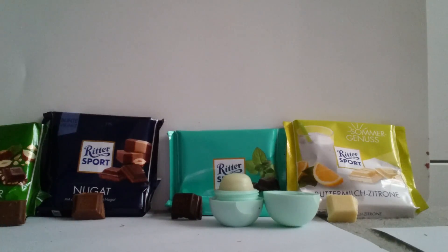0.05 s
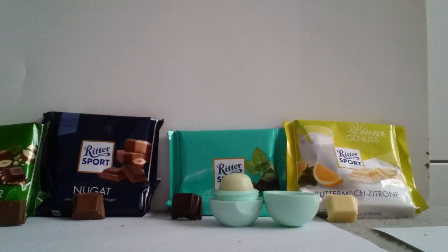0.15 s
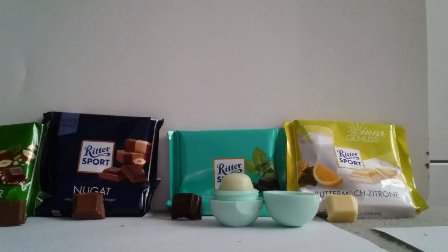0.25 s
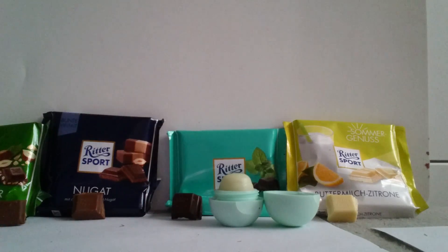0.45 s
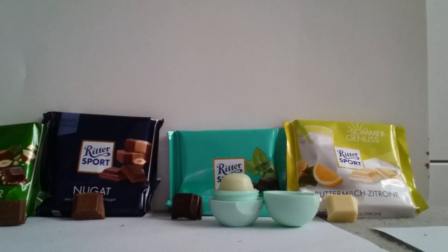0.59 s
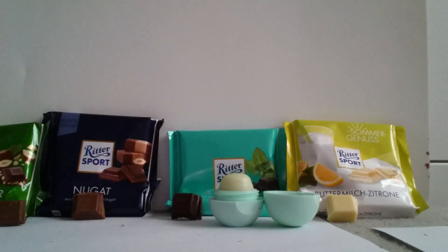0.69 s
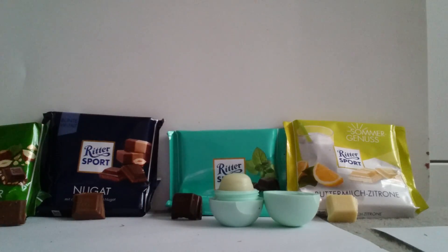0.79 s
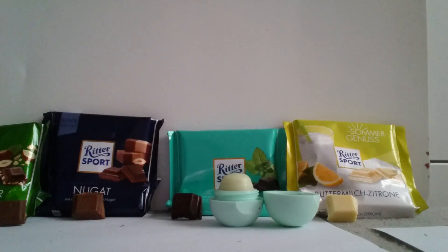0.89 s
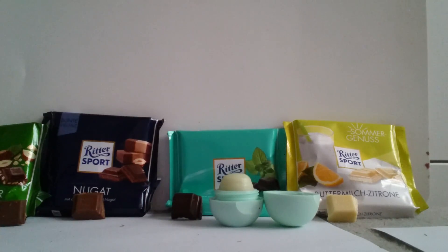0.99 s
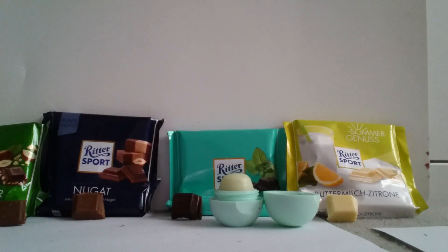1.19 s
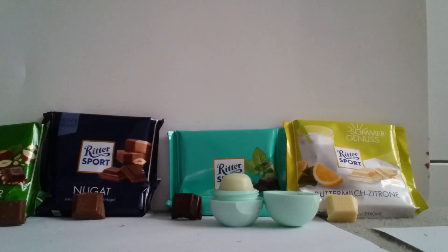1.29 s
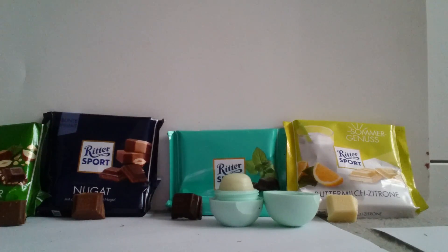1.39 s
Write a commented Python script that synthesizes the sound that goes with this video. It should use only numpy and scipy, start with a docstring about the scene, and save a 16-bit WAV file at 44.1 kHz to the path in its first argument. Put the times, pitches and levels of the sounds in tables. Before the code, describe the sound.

A stiff chocolate wrapper rustles and ticks lightly, close by in a quiet room. From about 0.2 to 0.3 seconds its seam gives way in a quickening run of loud snaps, followed by a faint squeak. Crinkles and finger rubbing pick up around 0.6 seconds, and the bar breaks with one sharp click near 0.75. Smaller crackles and a soft rustle die away by about 1.4 seconds.

```python
"""A stiff chocolate wrapper gives way in a quickening run of snaps, close by in a quiet room.
Each snap is a jump of the seam: an impulse, a little tearing, a short ring. Creases pop, film and bar
click, and the bar breaks with one sharp click. Tiny slips make the rub of fingers and a soft rustle
that dies away; the sliding film squeaks faintly. Two microphones of opposite polarity pick it up."""
import sys
import numpy as np
from scipy import signal
from scipy.fft import rfft, irfft
from scipy.io import wavfile
from scipy.ndimage import uniform_filter1d, minimum_filter1d

SR = 44100
rng = np.random.default_rng(int(sys.argv[2]) if len(sys.argv) > 2 else 0)


def dump_mix(stems):
    """Bounce the given channels to the path in sys.argv[1] as a 16-bit WAV at rate SR."""
    frames = np.atleast_2d(stems).T  # one column per channel
    limited = np.clip(frames, -1, 1)  # hard clip at full scale
    pcm = np.round(limited * 32767).astype(np.int16)
    wavfile.write(sys.argv[1], SR, pcm)


N = 63945
TIME_S = np.arange(N) / SR
FFT_SIZE = 2 ** 17
HZ = np.maximum(np.arange(FFT_SIZE // 2 + 1) * SR / FFT_SIZE, 1)
EVENT_HZ = np.linspace(1, SR / 2, 1025)  # coarse grid for short events


def from_db(db):
    return 10 ** (np.asarray(db) / 20)


def unit_rms(x):
    return x / np.sqrt(np.mean(x ** 2) + 1e-20)


def at_hz(points, hz=HZ):
    """Interpolate a table over log frequency."""
    points_hz, values = np.transpose(points)
    return np.interp(np.log(hz), np.log(points_hz), values)


def in_time(rows):
    """Interpolate each column linearly over time."""
    times_s, *columns = np.transpose(rows)
    return [np.interp(TIME_S, times_s, column) for column in columns]


def add(out, start_s, x):
    start = int(start_s * SR)
    out[..., start:start + x.shape[-1]] += x[..., :N - start]


def colour(x, gain):
    """Minimum-phase filter with the given gain per frequency."""
    size = 2 * (len(gain) - 1)
    cepstrum = irfft(np.log(gain + 1e-9))
    cepstrum[1:size // 2] *= 2
    cepstrum[size // 2 + 1:] = 0
    return irfft(rfft(x, size) * np.exp(rfft(cepstrum)))[..., :x.shape[-1]]


def resonance(hz, q):
    """Steep-sided resonance curve, peak 1."""
    return 1 / (1 + (q * (EVENT_HZ / hz - hz / EVENT_HZ)) ** 2)


def ringing(x, hz, hold_s, lift_db=0):
    """Delay and optionally lift one band, so it rings after the attack."""
    detune = 2 * np.pi * (HZ - hz) * hold_s
    allpass = ((1 - 1j * detune) / (1 + 1j * detune)) ** 2
    return irfft(rfft(x, FFT_SIZE) * allpass * from_db(lift_db / (1 + detune ** 2)))[:, :N]


def echoed(x, left_s, right_s, db):
    """Add one reflection from a nearby surface."""
    delay = np.exp(-2j * np.pi * np.outer([left_s, right_s], HZ))
    return x + from_db(db) * irfft(rfft(x, FFT_SIZE) * delay)[:, :N]


def panned(x, pan_db):
    """Pan by the level of left over right."""
    return np.array([x[0] * from_db(pan_db / 2), x[1] * from_db(-pan_db / 2)])


# Each row: frequency in Hz, left-right correlation.
DIRECT_CORRELATION = [(100, 0.85), (1000, 0.88), (2500, 0.94), (4500, 0.2), (8000, 0.47), (15000, 0.15)]
DIFFUSE_CORRELATION = [(100, 0.55), (700, 0.35), (2500, 0.094), (4500, 0.027), (15000, .05)]

def stereo(pair, correlation):
    """Mix two independent signals into partly correlated channels."""
    alike = np.clip(at_hz(correlation), -.99, .99)
    mid, side = rfft(pair, FFT_SIZE) * np.sqrt([(1 + alike) / 2, (1 - alike) / 2])
    return irfft([mid + side, mid - side])[:, :N]


# Each row: frequency in Hz, relative level in dB.
BACKGROUND_SPECTRUM = [(20, -18), (35, -37), (60, 16), (100, 12), (200, 3.5), (400, 8.5), (900, -1.5),
                       (2000, 4), (3600, 5), (5300, -13), (7000, 4), (11000, -23), (15500, -6)]

def background(level_db=-66.5):
    """Steady hiss and faint rumble of a quiet room."""
    hiss = colour(rng.standard_normal((2, N)), unit_rms(from_db(at_hz(BACKGROUND_SPECTRUM))))
    return from_db(level_db) * stereo(hiss, DIFFUSE_CORRELATION)


# Each row: frequency in Hz, relative gain in dB.
REVERB_SPECTRUM = [(150, 11), (700, -0.5), (1500, 5), (2200, -3), (4500, -2), (7500, -1), (15000, -4.5)]

def reverb(x, t60_s=.28, build_s=.004, gain_db=-11.5):
    """The room's diffuse tail builds quickly and decays exponentially."""
    envelope = from_db(-60 * TIME_S / t60_s) * (1 - np.exp(-(TIME_S / build_s) ** 2))
    tail = stereo(unit_rms(rng.standard_normal((2, N)) * envelope) / np.sqrt(N), DIFFUSE_CORRELATION)
    wet = signal.fftconvolve(x, tail, axes=1)[:, :N]
    return colour(wet, from_db(gain_db + at_hz(REVERB_SPECTRUM)))


def friction(levels, spectrum, correlation, slips_per_s=5600, spread_db=.5):
    """Dense tiny slips of uneven size under a level curve."""
    slipping = rng.random((2, N)) < slips_per_s / SR
    sizes = from_db(spread_db * np.minimum(rng.exponential(1, (2, N)), 5))
    signs = rng.choice([-1, 1], (2, N))
    level_db, = in_time(levels)
    slips = unit_rms(slipping * sizes * signs) * from_db(level_db)
    return stereo(colour(slips, unit_rms(from_db(at_hz(spectrum)))), correlation)


# Each row: time in seconds, level in dB.
RUSTLE_LEVELS = [(0, -48.5), (.045, -47), (.09, -50.5), (.125, -56), (.2, -51.5), (.27, -48.5),
                 (.33, -47.5), (.385, -45.5), (.45, -55.5), (.53, -59.5), (.585, -54), (.63, -41.5),
                 (.73, -56), (.84, -51), (.885, -46), (.93, -52.5), (1.03, -59.5), (1.085, -63.5),
                 (1.17, -57), (1.27, -52.5), (1.37, -61.5), (1.45, -61.5)]
# Each row: frequency in Hz, relative level in dB.
RUSTLE_SPECTRUM = [(200, -21), (900, -19.5), (2000, -38.5), (3100, -10), (4000, -8), (5000, 3),
                   (5800, -0.5), (7000, -11), (9000, -14), (12000, -17.5), (15000, -16.5)]
# Each row: time in seconds, pan in dB.
RUSTLE_PAN = [(0, -1.5), (.4, -2.5), (.9, -3), (1.3, -5)]

def film_rustle():
    """Fine, bright friction of the film, drifting right."""
    pan_db, = in_time(RUSTLE_PAN)
    return panned(friction(RUSTLE_LEVELS, RUSTLE_SPECTRUM, DIFFUSE_CORRELATION), pan_db)


# Each row: time in seconds, level in dB.
RUB_LEVELS = [(0, -69.5), (.44, -62), (.48, -64.5), (.57, -59.5), (.64, -41), (.665, -62), (.70, -45),
              (.735, -69), (.765, -39), (.80, -80), (.855, -61), (.88, -38), (.92, -62.5), (1.02, -57),
              (1.09, -69), (1.25, -60), (1.36, -69.5), (1.45, -72)]
# Each row: frequency in Hz, relative level in dB.
RUB_SPECTRUM = [(100, -19.5), (430, -17), (700, -0.5), (1000, 1.5), (1500, -1), (2200, -1.5), (3200, -5.5),
                (6000, -17.5), (15000, -19)]

def finger_rub():
    """Duller friction of fingers on the bar."""
    return friction(RUB_LEVELS, RUB_SPECTRUM, DIRECT_CORRELATION)


# Each row: time in seconds, pitch in Hz, level in dB.
SQUEAK_CURVE = [(.405, 1620, -54), (.435, 1579, -62), (.48, 1600, -49.5), (.52, 1663, -66),
                (.56, 1560, -61.5), (.59, 1670, -82)]

def film_squeak(wobble_hz=22.3):
    """Sliding film gives a thin, unsteady tone."""
    pitch_hz, level_db = in_time(SQUEAK_CURVE)
    wobble = unit_rms(uniform_filter1d(rng.standard_normal(N), size=200))
    phase = 2 * np.pi * np.cumsum(pitch_hz + wobble_hz * wobble) / SR
    sounding = (TIME_S > SQUEAK_CURVE[0][0]) & (TIME_S < SQUEAK_CURVE[-1][0])
    return sounding * from_db(level_db) * np.sqrt(2) * np.sin(phase)


def thud(start_s=.286, level_db=-60, cutoff_hz=110, rise_s=.0095, t60_s=.077):
    """A faint low jolt under the hardest snaps."""
    out = np.zeros((2, N))
    lowpass = signal.butter(2, cutoff_hz, fs=SR, output="sos")
    rumble = unit_rms(signal.sosfilt(lowpass, rng.standard_normal((2, N))))
    envelope = from_db(level_db - 60 * TIME_S / t60_s) * np.minimum(TIME_S / rise_s, 1)
    add(out, start_s, envelope * rumble)
    return out


def tearing(length_s, rise_s=.0002, fall_s=.00063, size=1024):
    """Two independent unit-energy noise bursts that decay after length_s."""
    t = np.arange(size) / SR
    envelope = np.minimum(t / rise_s, 1) * np.exp(-np.maximum(t - length_s, 0) / fall_s)
    burst = rng.standard_normal((2, size)) * envelope
    for _ in range(3):  # flatten the spectrum, keep the burst short
        burst = irfft(np.exp(1j * np.angle(rfft(burst)))) * np.sqrt(envelope)
    return unit_rms(burst) / np.sqrt(size)


KNOCK_HZ, BODY_HZ, CRACK_HZ, FIZZ_HZ = 797, 2040, 5130, 9300
KNOCK_Q, BODY_Q, CRACK_Q = 1.8, 4.1, 3.5

# Each row: frequency in Hz, relative level in dB.
CREASE_SPECTRUM = [(100, -30.5), (400, -31), (750, -4), (1100, -1.5), (2100, -13), (3200, -5), (4700, 6.5),
                   (5700, 7.5), (7300, -12), (12000, -21), (15000, -9)]
# Each row: start in seconds, level in dB, knock in dB, fizz in dB, length in ms.
CREASE_POPS = [(0.1444, -23.5, 14, 0, 1.24), (.3050, -3.5, 3.5, -27, 1.4), (0.3466, -22, 0, -4, 1.8),
               (0.595, -21, 10, -32, 2.5), (0.6257, -10.5, -15, -7, 2.4), (.6420, -22, 28, -2, 0.69),
               (0.666, -20, 16, -5, 1.8), (0.6707, -17, 7, -19, 1.4), (0.6829, -13.5, 17, -19, 0.73),
               (.6975, -12.5, 19, -16, 4.3), (.7025, -16.5, 18, -19, 1.55), (0.7083, -14, 2, -18, 0.59),
               (.7180, -22, 11, -22, 1.8), (0.753, -13, 13.5, -9, 1.7), (0.762, -20, 2, -2, 1.3),
               (0.812, -23, 13.5, -26, 3.7), (0.8524, -29, 27, 17, 1.26), (.8680, -13, 10, 4.5, 9.4),
               (.8950, -17.5, 13.5, 0, 7.9), (0.931, -23.5, 12.5, -13, 1.6), (0.9365, -29, 18, -2, 1.5),
               (0.9566, -21, -21, 1, 3.4), (.9630, -33, 26, -12, 2), (0.9961, -35.5, 30, 2, 3),
               (1.005, -28.5, 21, -3, 2.16), (1.030, -23, 8.5, -12, 8.5), (1.144, -23, -29, 4, 3.05),
               (1.1951, -17.5, -27, -1, 5.2)]

def creases():
    """Wrapper folds pop over, crisp or drawn out, some with a knock from the bar inside."""
    out = np.zeros((2, N))
    for start_s, level_db, knock_db, fizz_db, length_ms in CREASE_POPS:
        bands = [(KNOCK_HZ, knock_db), (BODY_HZ, knock_db / 2), (CRACK_HZ, 0), (FIZZ_HZ, fizz_db)]
        pop = colour(tearing(length_ms / 1000), from_db(level_db + at_hz(bands, EVENT_HZ)))
        add(out, start_s, pop)
    return stereo(colour(out, unit_rms(from_db(at_hz(CREASE_SPECTRUM)))), DIRECT_CORRELATION)


# Each row: frequency in Hz, relative level in dB.
FIZZ_SPECTRUM = [(100, -26), (400, -1.5), (1000, 0.5), (6000, 9.5), (7600, 1.5), (10000, -1), (12500, -0.5),
                 (15000, 4)]
# Each row: start in seconds, knock in Hz and dB, body in Hz and dB, crack in Hz and dB,
# fizz in dB, pan in dB.
FRACTURES = [(0.0619, 780, -8, 2640, -7, 4840, 5, -25.5, 2),
             (0.1493, 1830, -11.5, 4300, -11, 5340, 0.5, -26.5, -8),
             (0.1537, 1110, 1, 1900, 1.5, 4310, 9, -21, 2),
             (0.3571, 1010, 0.5, 3770, -1, 4900, -12, -13.5, 7),
             (0.3587, 1280, 2, 2550, 4.5, 4800, 8, -12, 1), (0.4549, 806, 4, 3270, -3, 5100, -7, -28, -1.5),
             (.6072, 1150, 6.5, 3220, 5, 4950, 11.5, -19, -2),
             (.6160, 1240, -6.5, 3300, -1, 4800, 7.5, -13, 0.5),
             (.7460, 1020, 11.5, 3390, 13.5, 4670, 17, -4.5, -0.5),
             (0.8299, 1520, -7, 2680, 3.5, 4870, 6.5, -26, 0)]

def clicks():
    """Short fractures of bar and film, each exciting three resonances over a broad fizz."""
    out = np.zeros((2, N))
    for start_s, knock_hz, knock_db, body_hz, body_db, crack_hz, crack_db, fizz_db, _ in FRACTURES:
        gains = [from_db(knock_db) * resonance(knock_hz, KNOCK_Q),
                 from_db(body_db) * resonance(body_hz, BODY_Q),
                 from_db(crack_db) * resonance(crack_hz, CRACK_Q),
                 from_db(fizz_db + at_hz(FIZZ_SPECTRUM, EVENT_HZ))]
        add(out, start_s, colour(tearing(length_s=.00207), np.linalg.norm(gains, axis=0)))
    pan_db, = in_time([(row[0], row[-1]) for row in FRACTURES])
    return panned(stereo(out, DIRECT_CORRELATION), pan_db)


# Each row: frequency in Hz, relative level in dB.
SNAP_SPECTRUM = [(100, -43), (350, -32), (700, -21), (1000, -9), (1450, -11), (2000, -3.5), (2550, -9.5),
                 (3300, -4), (4000, -4.5), (5800, -10.5), (7300, -18), (9000, -16), (12500, -21.5),
                 (15000, -9)]
# Each row: start in seconds, level in dB, knock in dB, body in dB, crack in Hz and dB,
# fizz in dB, pan in dB.
SEAM_JUMPS = [(.2120, 6, -0.5, 3.5, 6170, 8, -1, 0.5), (0.2393, 9, -1, -1, 5530, 11.5, -6.5, 0),
              (0.2591, 13, -3.5, -9, 5170, 3, -12, -3.5), (.2780, 18.5, -20, -3, 5520, 12, -7, -2.5),
              (0.2923, 20.5, -9.5, -1.5, 4670, 4, -4, 2.5), (.3000, 5, 5, -11, 4600, 13, -3, -5)]

def seam_snaps(tear_db=-5, ring_hz=3970, ring_loss_db_per_db=.35, pivot_db=16):
    """The seam jumps repeatedly: an impulse with a little tearing, then a short pitched ring."""
    out = np.zeros((2, N))
    for start_s, level_db, knock_db, body_db, crack_hz, crack_db, fizz_db, pan_db in SEAM_JUMPS:
        jump = from_db(tear_db) * tearing(length_s=.00103)
        jump[:, 0] += 1  # the impulse
        bands = [(KNOCK_HZ, knock_db), (BODY_HZ, body_db), (ring_hz, 0), (FIZZ_HZ, fizz_db)]
        tone_db = at_hz(bands, EVENT_HZ) + crack_db * resonance(crack_hz, CRACK_Q)
        # harder snaps ring relatively less
        tone_db -= ring_loss_db_per_db * (level_db - pivot_db) * resonance(ring_hz, q=7.1)
        snap = colour(jump, from_db(level_db + tone_db + at_hz(SNAP_SPECTRUM, EVENT_HZ)))
        add(out, start_s, panned(snap, pan_db))
    rung = ringing(out, ring_hz, hold_s=.0013, lift_db=4.5)
    return echoed(rung, left_s=.0013, right_s=.001131, db=-6)  # off the tabletop


def scene():
    """Wrapper and bar, with a wall echo, reverb and room hiss."""
    rustle = film_rustle()
    cracks = ringing(seam_snaps() + clicks(), hz=4300, hold_s=.00025)  # the film's broad resonance lags
    handling = cracks + creases() + thud() + film_squeak() + rustle + finger_rub()
    return echoed(handling, left_s=.0127, right_s=.0125, db=-21) + reverb(handling) + background()


def limiter(x, ceiling=.75, window_s=.003):
    """The gain ducks briefly around peaks above the ceiling."""
    size = int(window_s * SR)
    peak = np.abs(x).max(axis=0)
    gain = minimum_filter1d(ceiling / np.maximum(peak, ceiling), size)
    return x * uniform_filter1d(gain, size)


# Left microphone, then right. Each row: port resonance in Hz, width in Hz, gain in dB.
MIC_PORTS = [(4800, 120, 4), (5900, 450, 3.5)]

def record(dry, right_lag_s=.00013, cutoff_hz=16200):
    """Each port rings; the right side is inverted and late; peaks are limited and the top is cut."""
    left, right = [colour(channel, from_db(gain_db / (1 + (2 * (HZ - port_hz) / width_hz) ** 2)))
                   for channel, (port_hz, width_hz, gain_db) in zip(dry, MIC_PORTS)]
    right = -irfft(rfft(right, FFT_SIZE) * np.exp(-2j * np.pi * HZ * right_lag_s))[:N]
    lowpass = signal.ellip(10, .2, 70, cutoff_hz, fs=SR, output="sos")
    return signal.sosfilt(lowpass, limiter(np.array([left, right])))


dry = scene()
out = record(dry)
dump_mix(out)
```